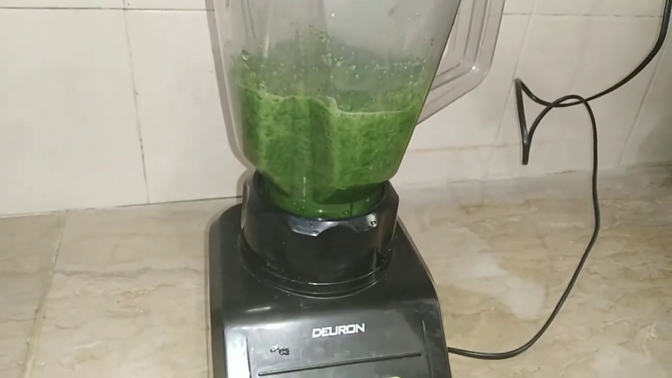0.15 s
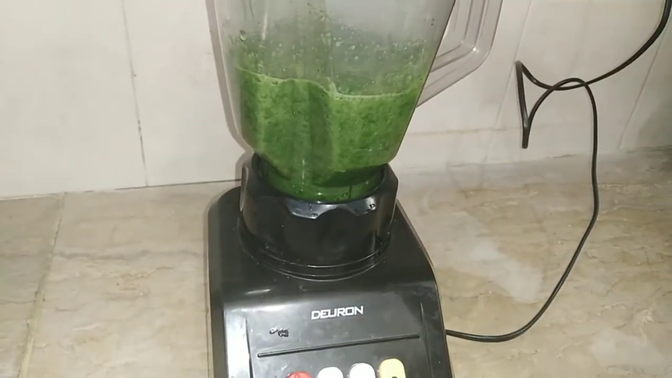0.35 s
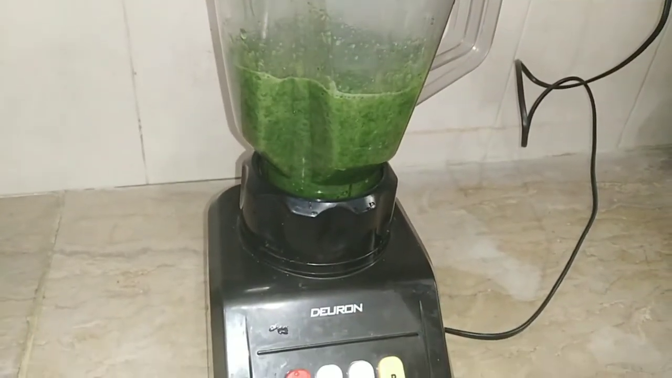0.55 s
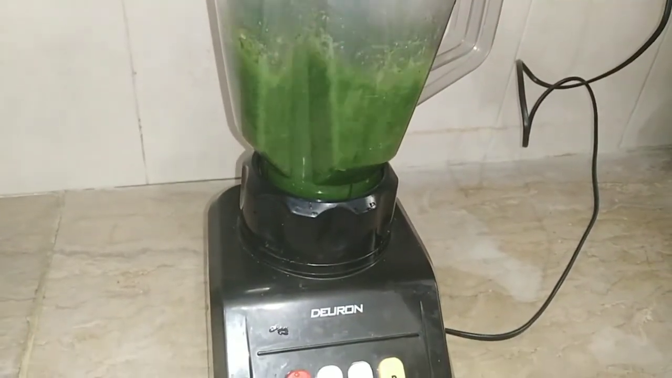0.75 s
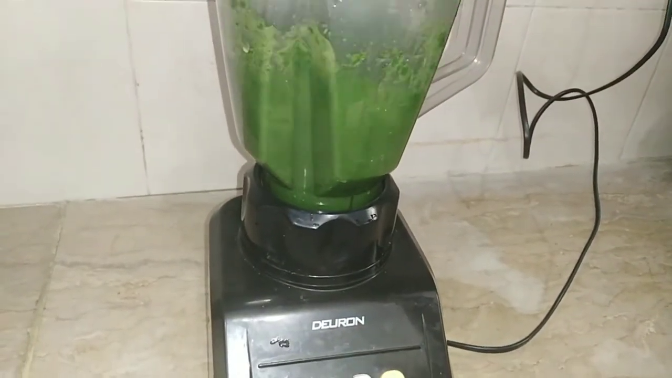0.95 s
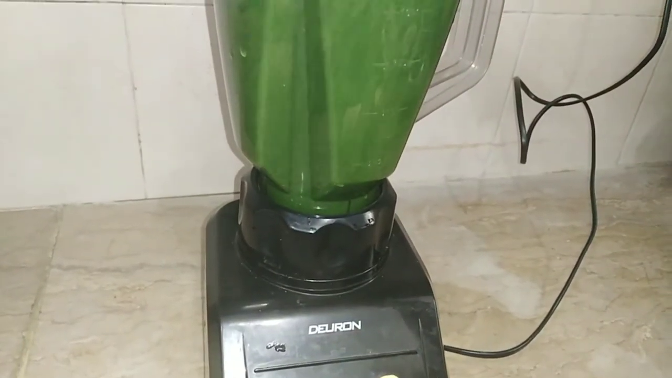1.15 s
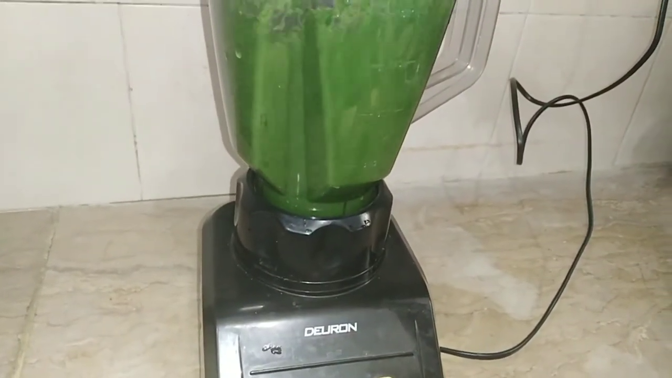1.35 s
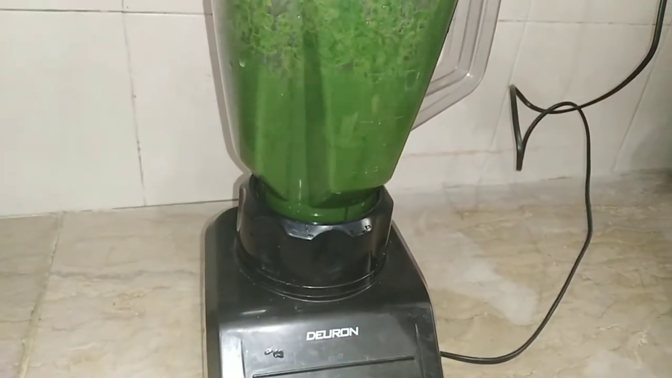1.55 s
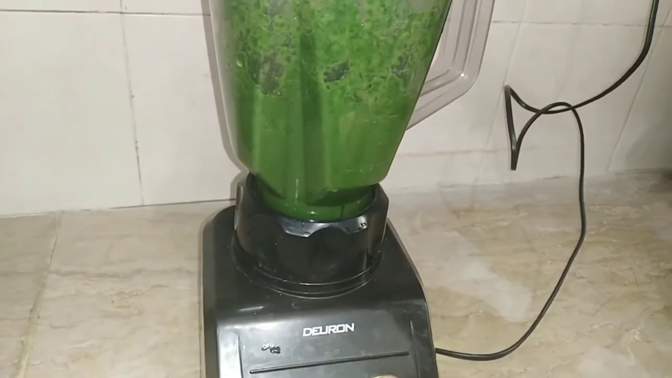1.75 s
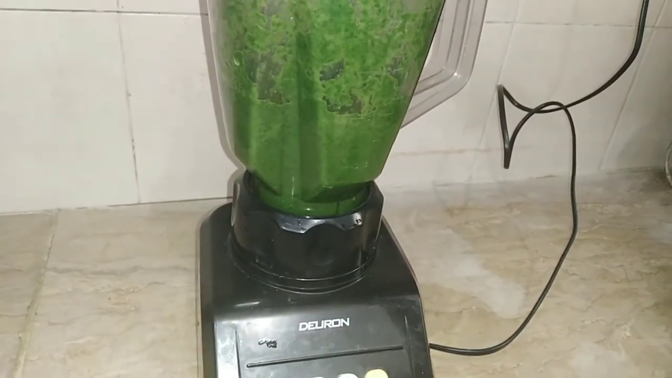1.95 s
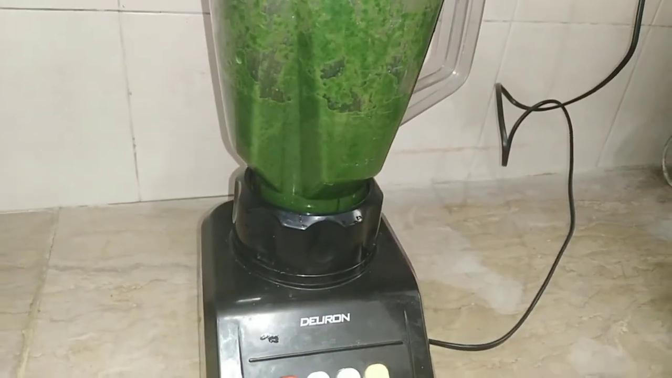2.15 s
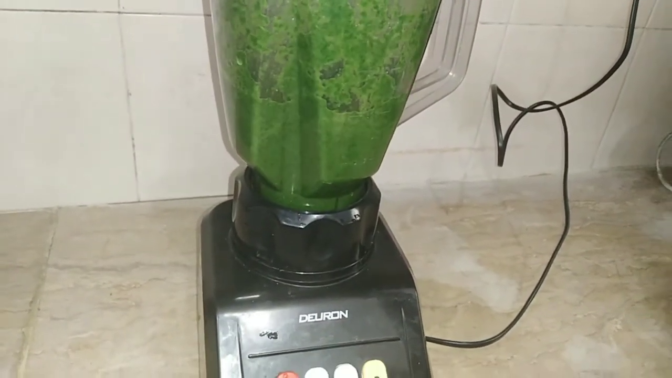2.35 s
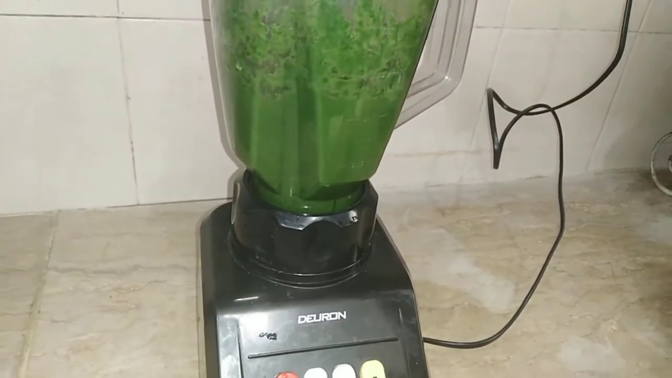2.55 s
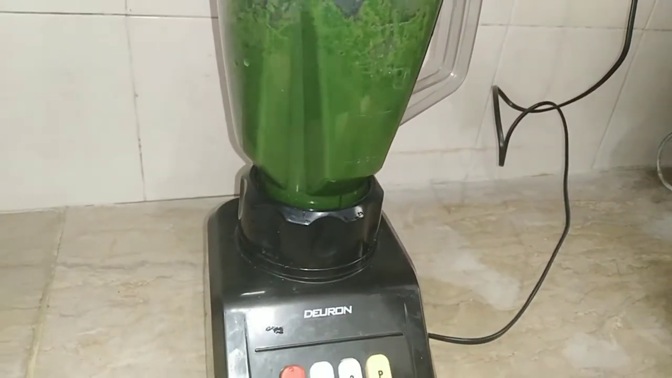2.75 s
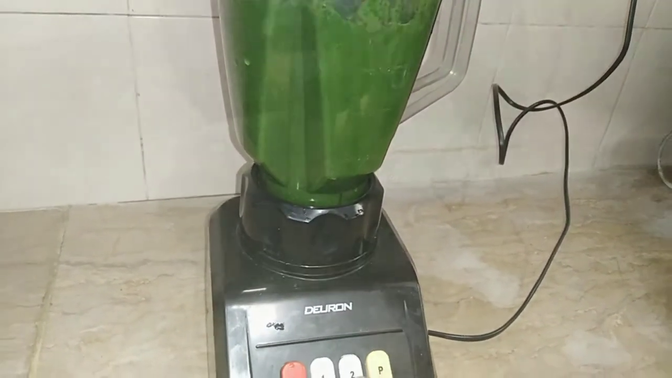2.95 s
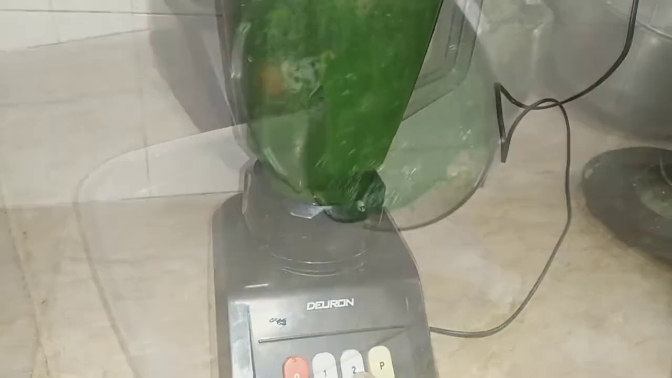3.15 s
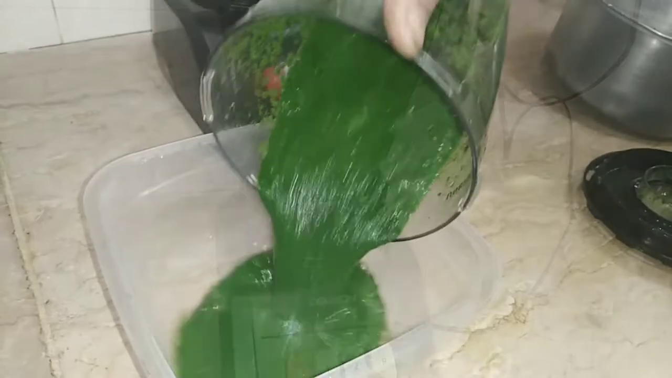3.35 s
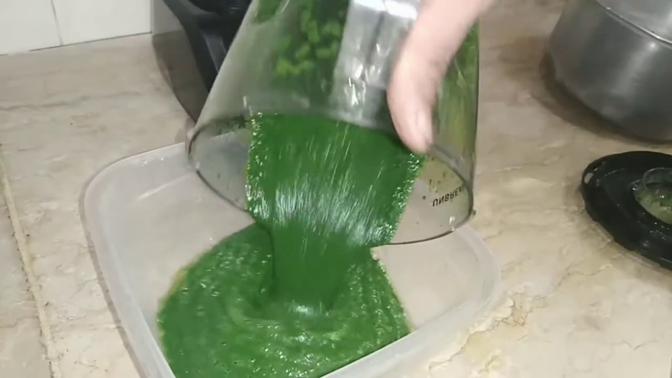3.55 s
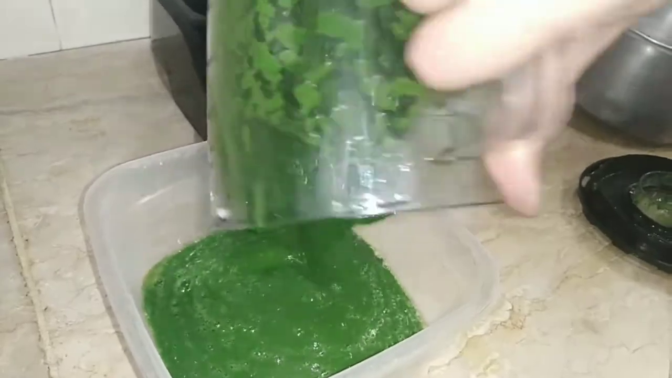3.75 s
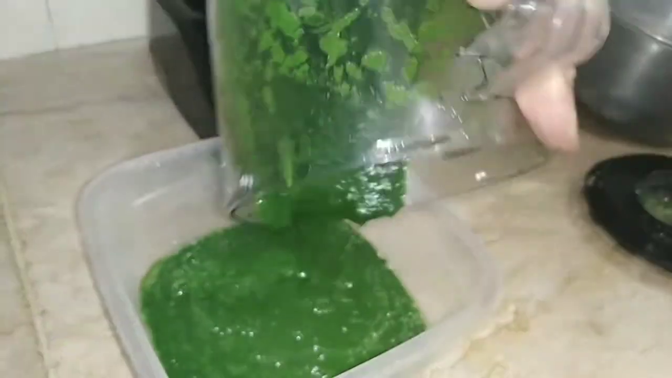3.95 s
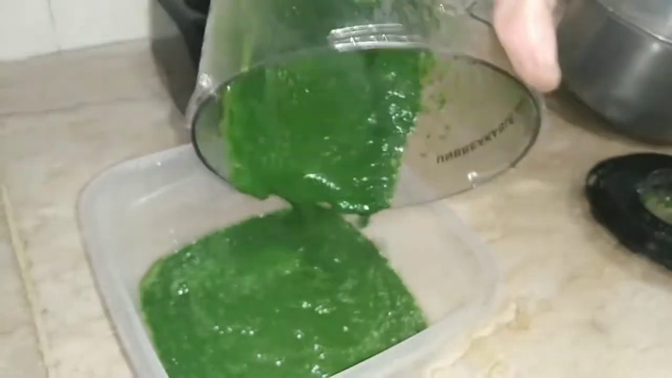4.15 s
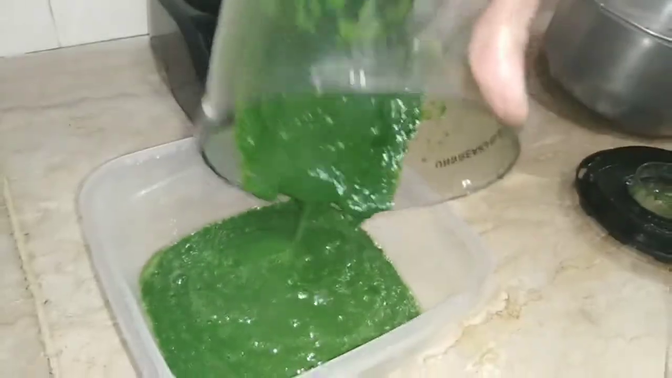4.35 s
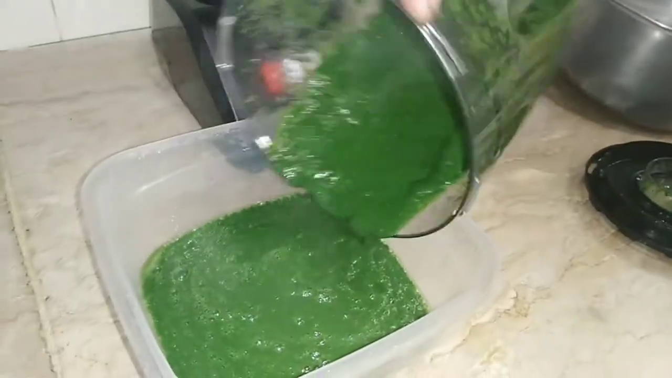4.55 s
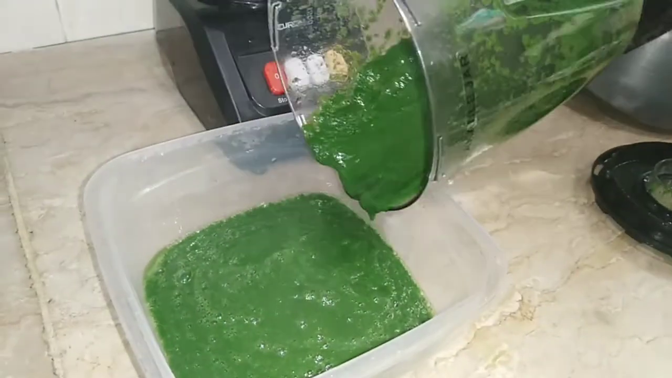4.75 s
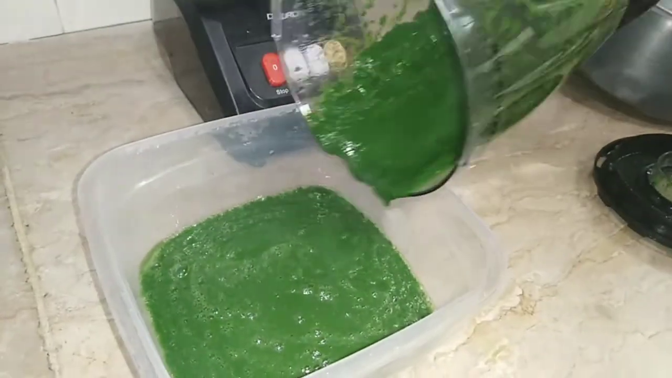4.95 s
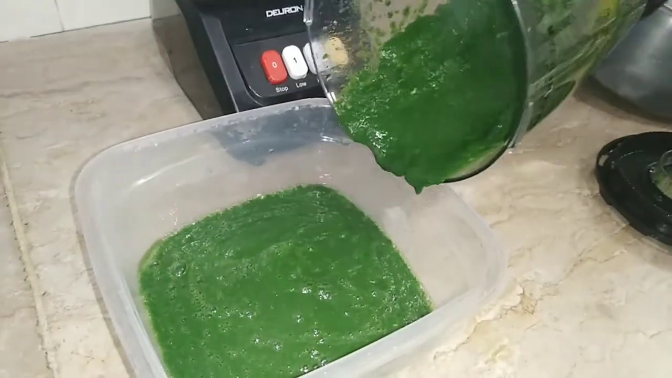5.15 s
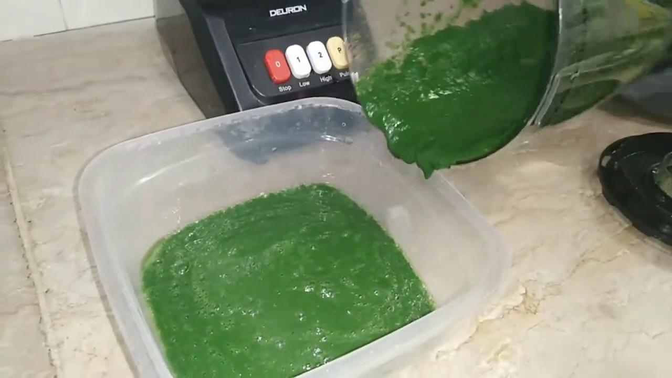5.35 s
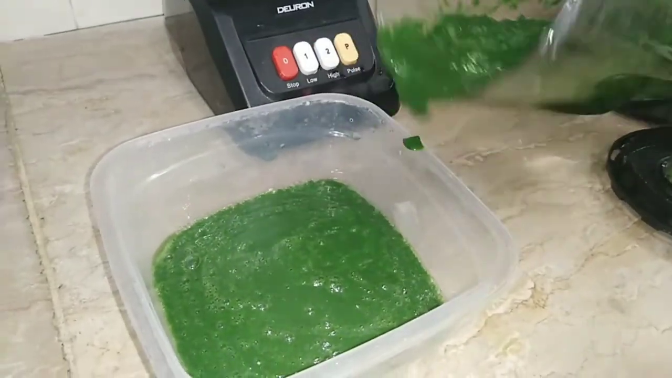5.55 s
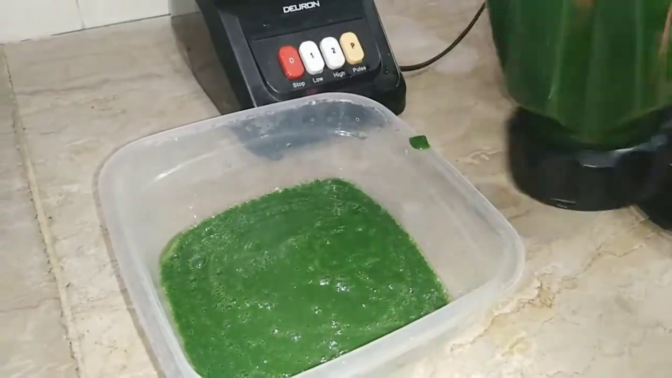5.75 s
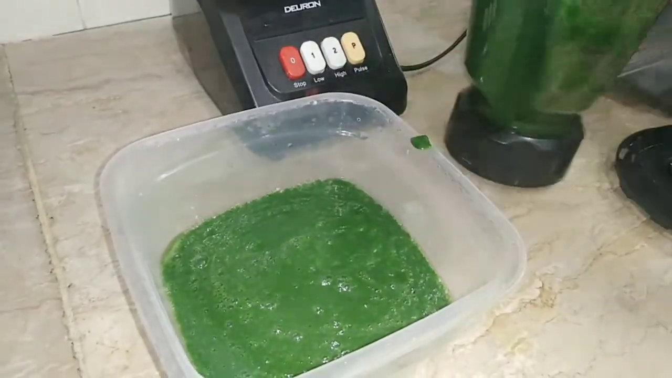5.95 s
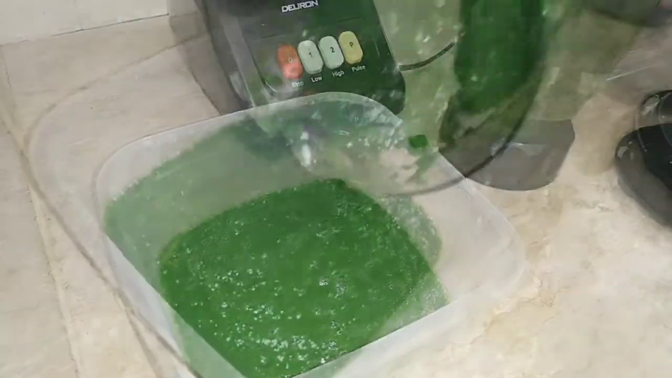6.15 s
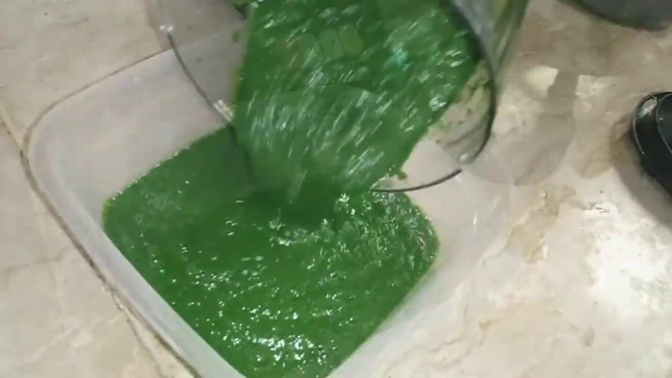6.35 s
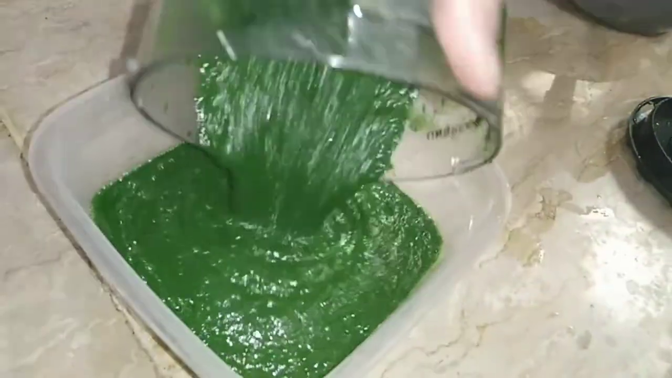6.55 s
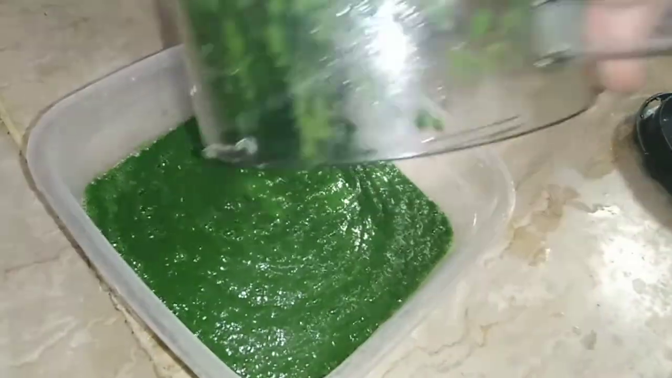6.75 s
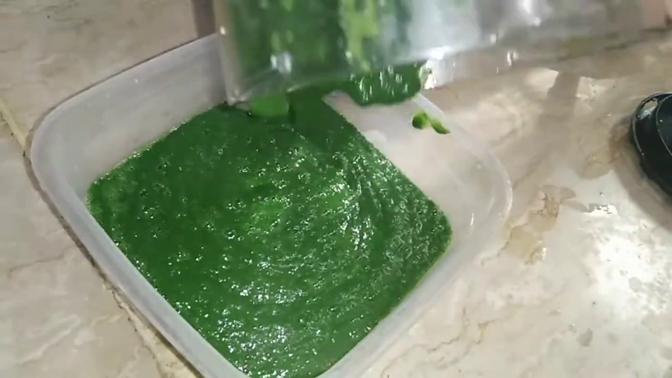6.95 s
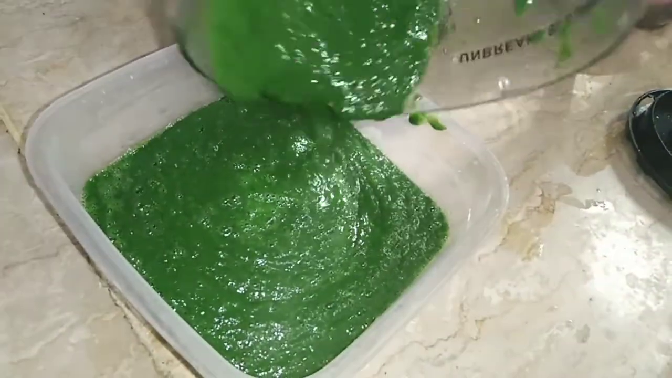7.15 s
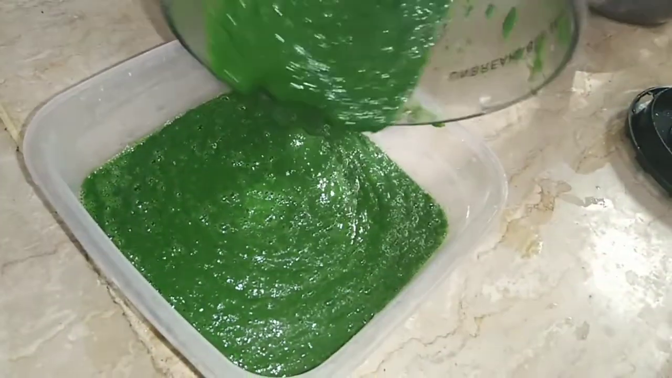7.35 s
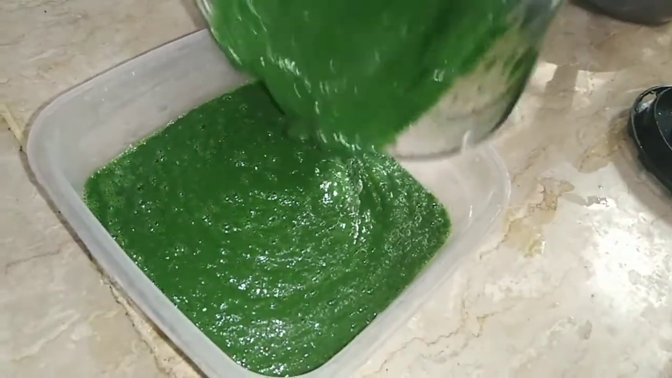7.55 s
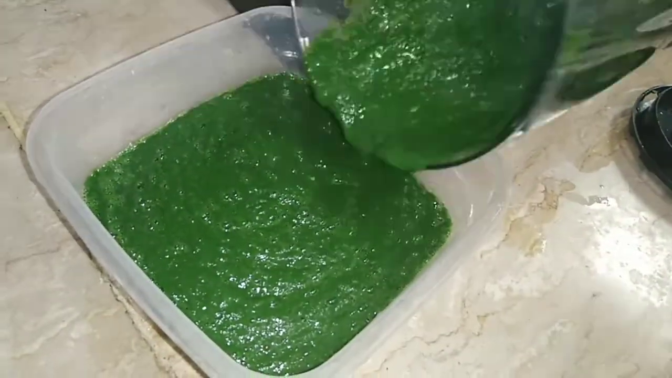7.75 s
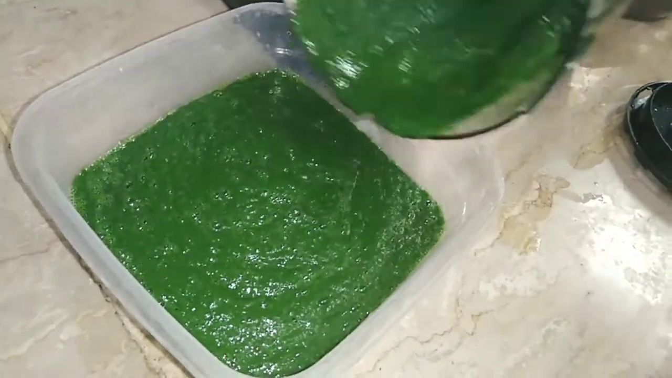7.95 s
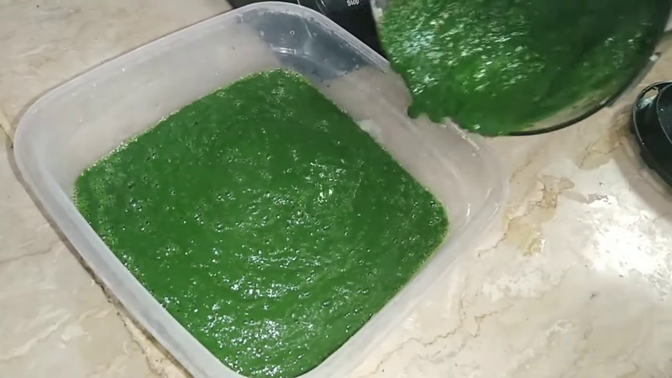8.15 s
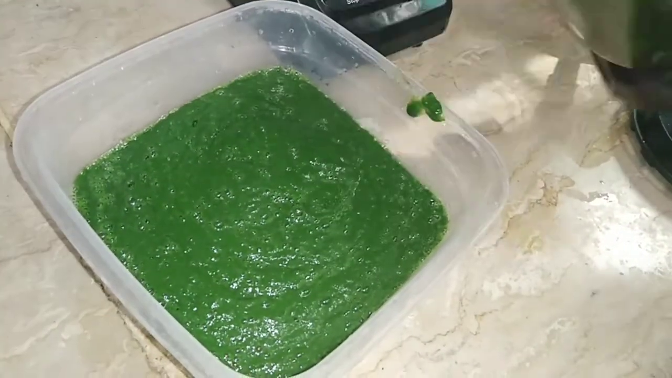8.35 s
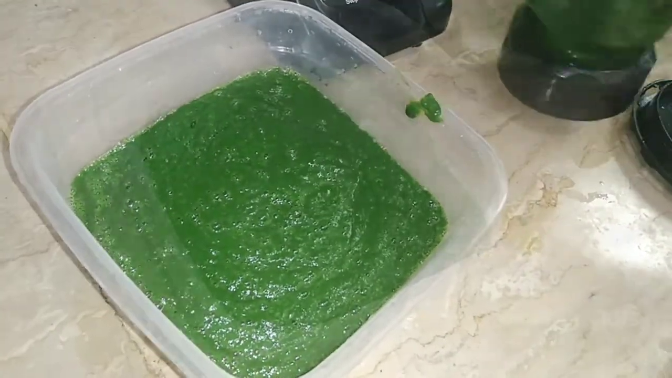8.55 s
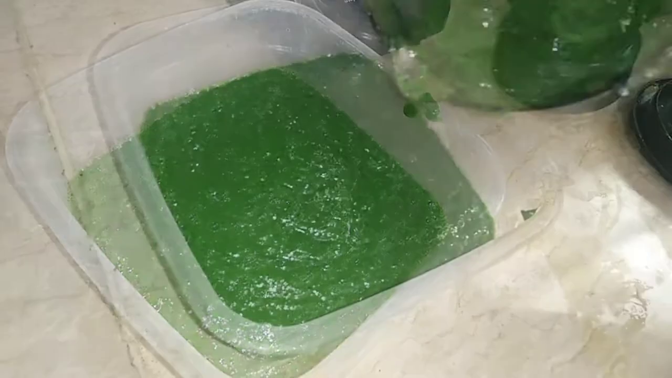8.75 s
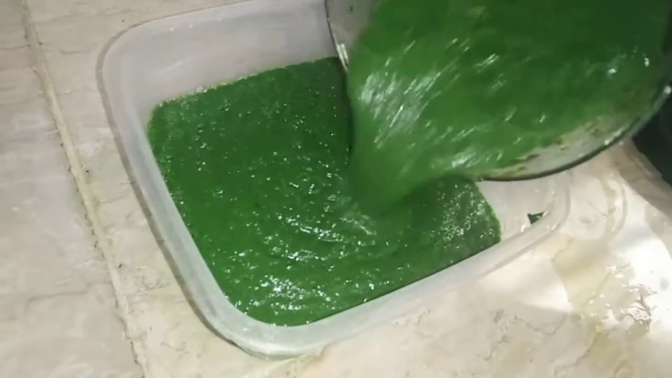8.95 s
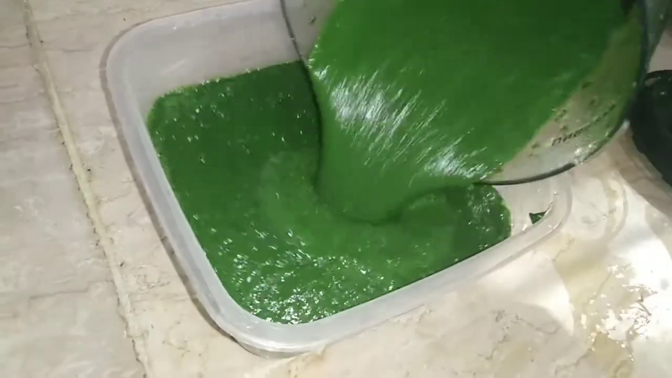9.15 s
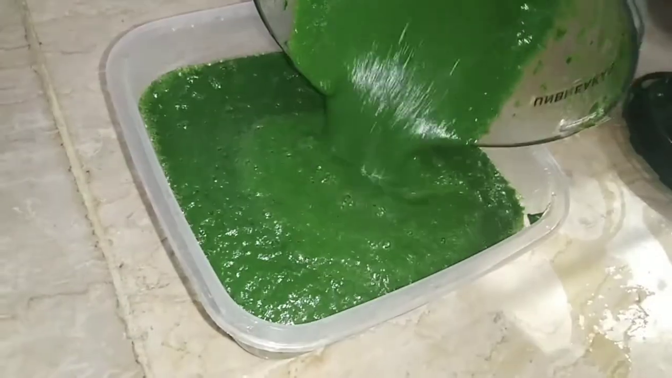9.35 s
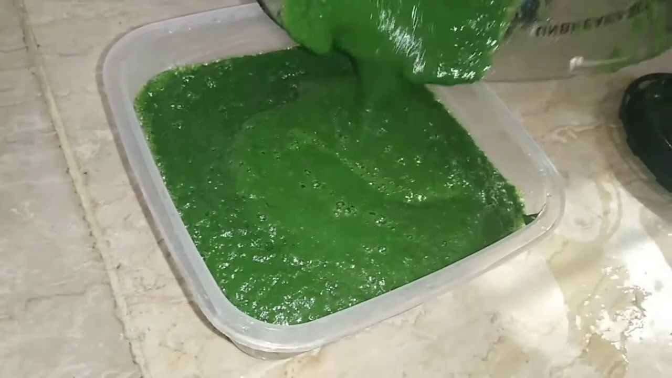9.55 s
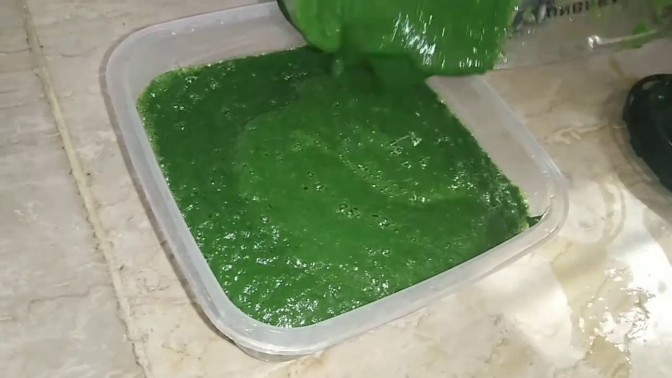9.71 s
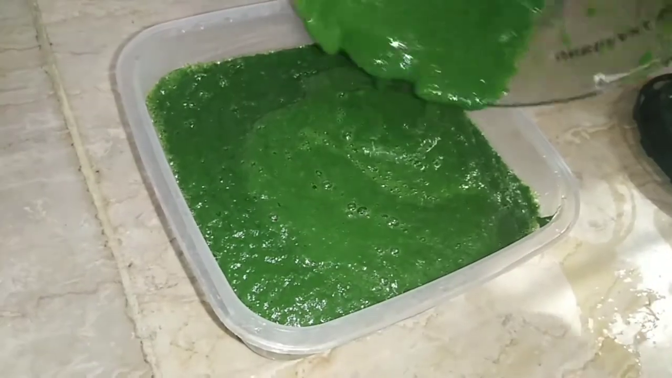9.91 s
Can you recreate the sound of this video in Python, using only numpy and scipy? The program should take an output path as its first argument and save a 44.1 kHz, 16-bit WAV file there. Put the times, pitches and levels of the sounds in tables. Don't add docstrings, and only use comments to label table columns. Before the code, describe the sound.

Close in a tiled kitchen, a faint knock and soft wet rustle open over quiet room tone. At 0.6 s a blender kicks in, a rough tonal buzz beneath a churning roar, racing free and sagging about six times before coasting down by 1.9 s. A knock at 2.4 s starts a second run with similar surges, fading from 3 s and gone by 3.7 s; crisp wet snaps come at 3.3 s. Low rumble then rises. Muffled finger bumps land at 3.8 and 4.7 s. From 4.2 s plastic scuffs, hollow rings and gurgles appear, with knocks and a long scrape around 5 to 5.5 s. A hard knock strikes at 6 s, then wet ticks and rubs, a heavy thud and splat at 8.1 s, scrapes at 8.5 s, a knock at 8.8 s with a squeak, and dense sticky ticking that thins out towards 10 s.

```python
import sys
import numpy as np
from scipy import signal
from scipy.fft import rfft, irfft, next_fast_len
from scipy.io import wavfile
from scipy.ndimage import uniform_filter1d

SR = 44100
rng = np.random.default_rng(int(sys.argv[2]) if len(sys.argv) > 2 else 0)


def gain_from_decibels(decibels):
    exponent = np.asarray(decibels, float) / 20
    return 10 ** exponent


def master_out(mix):
    frames = np.transpose(np.atleast_2d(mix))
    ceiling = np.clip(frames, -1, 1)
    pcm = np.round(ceiling * 32767).astype(np.int16)
    wavfile.write(sys.argv[1], SR, pcm)


N = 440118


def evened(x):
    return x / np.sqrt(np.mean(x ** 2) + 1e-20)


def read(points, hz):
    f, value = np.transpose(points)
    return np.interp(np.log(hz + 1), np.log(f + 1), value)


def add(mix, s, sound):
    part = mix[..., max(round(s * SR), 0):][..., :sound.shape[-1]]
    part += sound[..., :part.shape[-1]]


def resonate(x, hz, width):
    return signal.lfilter(*signal.iirpeak(hz, hz / width, SR), x)


# pitch_hz, likeness (0 to 1)
PORT_LIKENESS = [(60, .3), (150, 0.97), (380, 0.8), (800, 0.38), (1250, 0.63), (2000, 0.21), (15000, 0.098)]


def part_alike(first, other, hz):
    same = np.clip(read(PORT_LIKENESS, hz), -1, 1)[:, None]
    return same * first + np.sqrt(1 - same ** 2) * other


def noise(shape, count, patchy_db, size=512, bins=8):
    lag_s = .00017
    frames, hz = 2 * count // size + 5, np.fft.rfftfreq(size, 1 / SR)
    a, b, c, d, patches = rng.standard_normal((frames, len(hz), 5)).T
    patches = uniform_filter1d(patches, round(bins), axis=0)
    patches = evened(uniform_filter1d(patches, size=5, axis=1))
    left = a + 1j * b
    right = part_alike(left, c + 1j * d, hz)
    z = np.array([left * np.exp(-2j * np.pi * hz * lag_s)[:, None], right])
    z *= gain_from_decibels(read(shape, hz)[:, None] + patchy_db * patches)
    return evened(signal.istft(z, window="cosine", nperseg=size, noverlap=size // 2)[1][:, :count])


def burst(hz, octaves, rise, t60, count=6000, ripple_db=4):
    t = np.arange(count) / SR
    f = np.fft.rfftfreq(count, 1 / SR) + 1
    white, ripple = rng.standard_normal((count, 2)).T
    ripple = uniform_filter1d(ripple[:len(f)], size=count // 400)
    ripple = evened(uniform_filter1d(ripple, size=count // 400))
    ripple = evened(ripple - uniform_filter1d(ripple, size=count // 50))
    band = np.exp(-.5 * abs(np.log2(f / hz) / octaves) ** 3)
    treble_loss_db = 9 * np.maximum(np.log2(f / 8500), 0)
    x = irfft(rfft(white) * band * gain_from_decibels(ripple_db * ripple - treble_loss_db))
    rising = np.sin(np.pi / 2 * np.minimum(t / max(rise, 1e-4), 1)) ** 2
    return .5 * evened(x) * rising * gain_from_decibels(-60 * (np.maximum(t - rise, 0) / t60) ** 1.7)


def ring(hz, t60, rise=0.0034):
    t = np.arange(6500) / SR
    return np.sin(2 * np.pi * hz * t) * (1 - np.exp(-t / rise)) * gain_from_decibels(-60 * t / t60)


# pitch_hz, t60_s
KITCHEN_DECAY = [(200, 0.041), (1000, 0.19), (4000, 0.18), (10000, 0.2)]


def kitchen(x, wet_db, lag=4):
    taps = np.zeros((2, SR // 2))
    at = np.arange(150, SR // 2 - 20, 20) + rng.integers(0, 20, (2, (SR // 2 - 151) // 20))
    np.put_along_axis(taps, at, rng.choice([-1., 1.], at.shape), 1)
    hz, t, z = signal.stft(taps, SR, nperseg=256)
    z = np.array([z[0], part_alike(z[0], z[1], hz)])
    tail = signal.istft(z * gain_from_decibels(-60 * t / read(KITCHEN_DECAY, hz)[:, None]), SR, nperseg=256)[1]
    wet = signal.fftconvolve(x[None], tail / np.linalg.norm(tail[0]), axes=1)[:, :N]
    return np.array([np.roll(x, round(lag)), x]) + gain_from_decibels(wet_db) * wet


SWITCH_S = [.59, 2.349]
# after_switch_s, level_db of the roar
MOTOR_START = [
    (.008, -90),
    (0.015, -49),
    (0.072, -32),
    (.085, -38),
    (0.171, -34.5),
]
# time_s, level_db of the roar
RUN_ENDS = [
    [(1.6, -35), (1.68, -35.5), (1.894, -70), (1.97, -81)],
    [(2.974, -37.5), (3.36, -44), (3.58, -53), (3.72, -79.5)],
]


def run(switch, end):
    s, db = np.transpose([(switch + a, d) for a, d in MOTOR_START] + end)
    t = np.arange(s[0], s[-1], 1 / SR)
    return t, np.interp(t, s, db)


# pitch_hz, level_db per Hz
RUMBLE_SPECTRUM = [(15, -68), (25, -33.5), (59, -21.5), (82, -6), (102, 2.5), (167, -7), (204, -2),
                   (256, -10.5), (297, -4), (362, -11), (403, -23.5), (505, -36), (600, -31.5),
                   (780, -62.5), (1320, -120)]
# time_s, level_db
RUMBLE_LEVEL = [(0, -54), (.16, -73), (2.5, -73.5), (3.56, -50), (5.09, -47), (5.89, -50), (8.12, -47),
                (8.61, -50), (9.98, -48.5)]
# pitch_hz, level_db per Hz
MURMUR_SPECTRUM = [(150, -38.5), (260, -4), (330, 0), (430, -7.5), (520, -24), (750, -30.5), (1100, -60.5)]
# time_s, level_db
COUNTER_JOLTS = [
    (.69, -48),
    (1.778, -51),
    (2.45, -59),
]


def background():
    jolt_s, shake_db, hiss_db, murmur_db = .053, -32, -31.5, -79
    t = np.arange(N) / SR
    level = gain_from_decibels(np.interp(t, *np.transpose(RUMBLE_LEVEL)))
    shake = sum(gain_from_decibels(db) * np.exp(-((t - s) / jolt_s) ** 2) for s, db in COUNTER_JOLTS)
    for switch, end in zip(SWITCH_S, RUN_ENDS):
        add(shake, switch, gain_from_decibels(run(switch, end)[1] + shake_db))
    rumble = gain_from_decibels(-0.5) * noise(RUMBLE_SPECTRUM, count=N, patchy_db=1.5, size=2048, bins=3)
    hiss_spectrum = [(300, -6.0), (700, 1.0), (4000, -5.0), (14000, -10.5)]  # Hz, dB per Hz
    hiss = gain_from_decibels(hiss_db) * noise(hiss_spectrum, count=N, patchy_db=4.0)
    mix = level * (rumble + hiss) + shake * rumble
    murmur = noise(MURMUR_SPECTRUM, count=5 * SR // 2, patchy_db=3.0, size=2048, bins=3)
    add(mix, 0, gain_from_decibels(murmur_db) * murmur)
    return mix


# start_s, level_db, pace of the swing (cycles after t s: pace * t ** .72)
FINGER_BUMPS = [
    (3.778, -18, 35),
    (4.68, -15.5, 34),
    (4.702, -28, 34),
    (2.86, -36, 28),
]


def bumps():
    out, t = np.zeros((2, N)), np.arange(1800) / SR
    tick = np.exp(-((t - .0027) / .0004) ** 2)
    for s, db, pace in FINGER_BUMPS:
        swing = -np.sin(2 * np.pi * pace * t ** .72)
        swing *= np.exp(-(t / .014) ** 2) * np.tanh((t / .0011) ** 2)
        add(out[0], s + .0045, gain_from_decibels(db) * swing)
        add(out[0], s, gain_from_decibels(db - 11) * tick)
    return out


def swell(s, spread):
    t = np.arange(max(-s, -3 * spread), 3 * spread, 1 / SR)
    return s + t[0], gain_from_decibels(-13.5 * abs(t) / spread)


def droplets(count, per_s, lift_db):
    hits = (rng.random(count) < per_s / SR) * rng.exponential(1, count)
    return 1 + gain_from_decibels(lift_db) * signal.lfilter([1], [1, -np.exp(-1 / (0.0068 * SR))], hits)


# pitch_hz, level_db per Hz
TUB_HOLLOW = [(380, -51), (480, 12.5), (600, 13.5), (720, 1), (900, -42)]
# pitch_hz, level_db per Hz
SLIDE_BODY = [(600, -7.5), (800, -6), (1300, 0), (2500, -7.5), (3200, -34.5)]
# pitch_hz, level_db per Hz
SLIDE_FIZZ = [(2000, -31), (2700, -13), (4800, -5), (6300, -2.5), (7250, 5.5), (8300, -9), (14000, -25.5)]
# peak_s, spread_s, level_db
GURGLES = [(0, 0.18, -67.5), (3.91, 0.14, -57.5), (4.721, 0.17, -76), (5.24, .15, -53), (6.06, .1, -58.5),
           (6.33, 0.23, -63.5), (6.95, 0.2, -78), (7.26, 0.14, -73), (7.56, 0.24, -68), (8.14, 0.062, -51),
           (8.57, 0.11, -57.5), (8.94, 0.088, -57.5), (9.98, 0.086, -81)]
# peak_s, spread_s, body level_db, fizz level_db re body
SLIDES = [(0, 0.11, -58, 0.5), (2.33, .03, -74, -11), (4.72, 0.078, -77.5, -6), (5.04, 0.096, -75, -6),
          (5.281, .1, -59, -24.5), (5.68, 0.048, -100, 9), (6.18, .1, -69.5, 2), (6.47, 0.12, -66.5, 11.5),
          (6.69, .08, -75.5, 11), (7.699, .1, -74, 3), (8.14, .12, -73.5, 3), (8.571, .09, -65.5, -7),
          (8.78, .1, -61.5, 2), (8.9, .18, -63, 7), (9.098, .1, -71.5, 11.5), (8.72, .06, -64.5, 4.5),
          (9.02, .12, -71.5, 16.5), (9.22, .12, -81.5, 21), (6.4, .07, -61.5, 4), (9.8, .14, -82.5, 15),
          (9.97, 0.19, -94, 29)]


def slosh():
    out, tub, pour = np.zeros((2, N)), np.zeros(N), round(3.7 * SR)
    tub[pour:] = gain_from_decibels(-89)
    for s, spread, db in GURGLES:
        start, gain = swell(s, spread)
        add(tub, start, gain_from_decibels(db) * gain)
    for a, b in (0, SR // 2), (pour - SR // 4, N):
        out[:, a:b] = gain_from_decibels(4.0) * tub[a:b] * noise(TUB_HOLLOW, count=b - a, patchy_db=9.5, bins=1)
    for s, spread, db, fizz_db in SLIDES:
        start, gain = swell(s, spread)
        count = len(gain)
        body = droplets(count, 40, -4) * noise(SLIDE_BODY, count=count, patchy_db=6., bins=1)
        fizz = droplets(count, 110, -2) * noise(SLIDE_FIZZ, count=count, patchy_db=3.5, bins=3)
        add(out, start, gain_from_decibels(db) * gain * (body + gain_from_decibels(fizz_db - 3.5) * fizz))
    return out


# start_s, level_db, spacing_hz, t60_s
JAR_DRAGS = [
    (5.184, -46, 679, 0.15),
    (5.494, -67.5, 680, 0.049),
    (8.1, -52, 676, 0.071),
    (8.502, -46, 664, .1),
    (8.612, -44, 674, 0.067),
]
# start_s, level_db, pitch_hz, spread_octaves, t60_s
SPLATS = [(5.047, -38, 2000, 0.6, 0.013), (5.08, -44, 1700, .6, 0.011), (5.19, -60, 7200, 0.11, .16),
          (5.385, -52.5, 2480, 0.3, 0.08), (5.388, -62, 7500, .12, .06), (5.6, -64, 4600, 0.18, .06),
          (5.651, -54.5, 7520, .45, .06), (5.026, -60, 6900, .12, .03), (4.98, -66, 6900, .08, .2),
          (7.127, -40, 4000, .5, .012), (7.065, -54.5, 6500, 0.42, 0.11), (7.128, -54, 10500, .25, .07),
          (8.072, -32, 165, 0.39, 0.077), (8.072, -37, 560, 0.25, 0.071), (8.072, -33, 2700, 0.6, 0.039),
          (8.88, -34, 2370, .15, .11), (8.7, -52, 3000, .7, .16), (8.8, -48, 3000, .7, .14),
          (8.257, -58, 3100, .1, .05), (8.45, -63, 1600, .2, 0.11), (8.882, -43, 4670, .17, 0.11),
          (8.888, -46, 3400, .1, .06), (8.918, -44, 6700, .3, .006), (9.086, -48.5, 1500, 0.25, 0.023),
          (9.11, -64, 1600, 0.28, 0.035), (5.585, -54, 1900, .35, .11), (9.43, -66, 7200, .08, .16),
          (9.208, -42, 6000, 0.63, .004), (9.21, -58, 1130, 0.11, 0.034), (9.212, -61.5, 1740, .1, 0.05),
          (9.605, -58, 7150, 0.12, 0.16), (9.63, -57, 5000, .2, 0.096), (9.71, -61, 7200, 0.077, .2),
          (9.83, -57, 7200, .15, 0.2), (9.85, -58, 5200, .2, 0.12)]


def splats():
    out = np.zeros(N)
    for s, db, hz, t60 in JAR_DRAGS:
        loop = np.r_[1, np.zeros(round(SR / hz) - 1), -.62]
        rub = burst(1800, 1.32, .028, t60, ripple_db=2)
        add(out, s, gain_from_decibels(db) * signal.lfilter([1], loop, rub))
    for s, db, hz, octaves, t60 in SPLATS:
        add(out, s, gain_from_decibels(db) * burst(hz, octaves, 1.1 * t60 ** 2, t60, ripple_db=3.5))
    return kitchen(out, wet_db=-8.5, lag=3)


# start_s, level_db, pitch_hz, hardness_db re peak, t60_s
KNOCKS = [(0.004, -55, 361.4, -12, 0.34), (0.061, -43, 286, -24, 0.13), (0.155, -51.5, 307, -31, 0.12),
          (1.906, -49.5, 289, -25, 0.12), (2.403, -32, 269.7, -22, 0.17), (4.824, -25.5, 326, -36, 0.058),
          (4.87, -35.5, 335, -43, 0.12), (5.048, -29, 340, -30.5, 0.067), (5.08, -30.5, 285, -36, 0.075),
          (5.115, -44.5, 400, -41, 0.075), (5.729, -42.5, 297, -65, 0.079), (5.984, -15.5, 432, -32, 0.08),
          (6.128, -37, 209.6, -41, 0.27), (6.147, -27.5, 451, -35, 0.081), (6.247, -36.5, 276, -56, 0.057),
          (8.072, -27.5, 406, -20.5, 0.076), (8.52, -38.5, 285, -24, 0.13),
          (8.775, -20.5, 290, -36.5, 0.058)]


def knocks():
    out = np.zeros(N)
    for s, db, hz, hard_db, t60 in KNOCKS:
        body = ring(hz, t60) + 0.84 * ring(0.674 * hz, 0.59 * t60) + .5 * ring(1.45 * hz, 0.75 * t60)
        add(out, s, gain_from_decibels(db + 3.0) * body)
        add(out, s, gain_from_decibels(db + 4 + .56 * hard_db) * burst(790, 0.97, 0.0019, 0.04, count=3000))
        add(out, s, gain_from_decibels(db + hard_db + 14.0) * burst(2700, 0.99, 0.00065, 0.024, count=3000))
    return out


# start_s, level_db, pitch_hz, brightness_db re peak, t60_s
SCUFFS = [(4.16, -51.5, 1200, -14, 0.14), (4.22, -78.5, 3000, 14, .08), (5.022, -47, 1500, -22, .06),
          (4.98, -48, 1030, -30, 0.39), (5.194, -25.5, 1430, -44, 0.26), (5.383, -41.5, 1630, -45, 0.04),
          (5.5, -47, 1460, -36, 0.027), (5.584, -45, 1450, -34, 0.18), (5.65, -66, 1680, -7, 0.046),
          (6.346, -47, 1330, 0.5, 0.25), (6.383, -27.5, 1950, -19.5, 0.15), (6.44, -41, 2720, -13, 0.22),
          (6.784, -47, 1440, -15, 0.073), (7.071, -59, 1240, -6, 0.11), (7.526, -38, 970, 1.5, 0.12),
          (7.547, -32, 1500, -0.5, 0.11), (7.949, -62.5, 2970, 9.5, 0.22), (8.118, -30.5, 1590, -44, 0.071),
          (8.273, -50.5, 2440, 2, 0.17), (8.515, -35, 1380, -7, 0.14), (8.624, -35, 2030, -6, 0.081),
          (8.8, -37, 1610, -14, 0.62), (8.888, -32.5, 2480, -21.5, 0.065), (9.084, -39.5, 1530, -7, 0.032),
          (9.618, -56.5, 1360, -4, 0.28), (9.835, -51, 1970, -18, 0.2)]


def scuffs():
    out, rise_s, lead_s = np.zeros(N), .036, .018
    for s, db, hz, bright_db, t60 in SCUFFS:
        add(out, s - lead_s, gain_from_decibels(db - 14) * burst(0.76 * hz, 1.37, rise_s, t60, ripple_db=3.5))
        add(out, s - lead_s, gain_from_decibels(db + bright_db - 2.5) * burst(5100, 0.92, rise_s, 0.62 * t60))
    return out


# start_s, level_db, pitch_hz, spread_octaves
TICKS = [(0.156, -69, 7240, 0.48), (0.3055, -66, 5190, 0.18), (3.316, -29.5, 8300, 0.72),
         (3.32, -34, 7300, .25), (3.336, -28, 6700, 0.3), (3.338, -31, 7100, 0.15),
         (3.744, -50, 6200, 0.27), (3.92, -47.5, 7270, 0.21), (4.0165, -59, 7300, 0.39),
         (4.278, -46.5, 6040, 0.67), (4.3874, -56.5, 5050, 0.9), (4.443, -65, 8200, 0.21),
         (5.9867, -26.5, 1480, 0.51), (6.264, -51, 1100, 0.82), (6.273, -60, 7110, 0.69),
         (6.4702, -44, 7490, 0.41), (6.5338, -51, 7260, 0.48), (6.554, -38, 6460, 0.96),
         (6.6678, -59, 6900, 0.4), (6.686, -50, 6820, 0.39), (6.7017, -40, 5340, 0.66),
         (6.766, -54, 8500, .2), (6.8063, -50.5, 3130, .2), (6.874, -30, 3880, 0.45),
         (6.874, -51, 11000, 0.3), (6.9514, -47.5, 7100, 1.1), (7.1253, -25.5, 6000, 0.76),
         (7.2782, -42, 6850, 0.67), (7.3623, -37.5, 5300, 0.59), (7.656, -38, 7700, 0.86),
         (8.797, -42, 6900, 0.6), (8.871, -51, 7500, .4), (8.974, -38.5, 7600, .35),
         (8.998, -43, 7000, 0.37), (9.017, -42, 6800, 0.44), (9.088, -38.5, 4300, 0.96),
         (9.106, -40, 7000, 0.29), (9.114, -42, 7000, .4), (9.176, -40.5, 7350, .4),
         (9.184, -42.5, 7800, 0.43), (9.217, -44, 7200, 0.27), (9.2396, -50, 7310, .3),
         (9.281, -49, 7050, .35), (9.2075, -49, 4220, 0.79), (9.251, -46, 7200, 0.26),
         (9.3386, -51.5, 7100, 0.17), (9.413, -52, 7000, 0.26), (9.4185, -43, 6500, 0.38),
         (9.5708, -55.5, 8500, 0.22), (9.6753, -50, 8350, 0.23)]


def ticks():
    trails, near = np.zeros((2, N))
    for s, db, hz, octaves in TICKS:
        trail_db = -11.5 - 28 * octaves
        snap = burst(hz, octaves, .0008, .008, count=1200)
        halo = burst(hz, octaves, .006, .025, count=1200)
        trail = burst(min(hz, 6800), .8 * octaves, .016, .07, ripple_db=6)
        add(near, s - .004, gain_from_decibels(db - 9) * halo)
        add(near, s, gain_from_decibels(db) * snap / abs(snap).max())
        add(trails, s - .008, gain_from_decibels(db + trail_db) * trail)
    return trails, near


# start_s, level_db, pitch_hz
SPRAY = (6.785, -60, 11500)


def spray():
    out = np.zeros(N)
    s, db, hz = SPRAY
    add(out, s, gain_from_decibels(db) * burst(hz, .3, 0.0039, .09))
    return out


# start_s, level_db, pitch_hz, t60_s
WHISTLES = [(3.769, -69, 1490, 1), (4.4594, -76, 6440, 0.22), (4.6598, -67, 6300, 0.1),
            (6.569, -64, 8400, 0.49), (7.245, -67, 7050, 0.28), (7.75, -59, 3190, 0.23),
            (7.79, -71, 6650, 0.37), (7.659, -57, 1840, 0.44), (7.9154, -67, 2820, 0.097),
            (4.461, -75, 7450, .15), (4.97, -57, 1040, .25), (4.6, -70, 2050, .2), (5.5, -63, 1700, 0.1),
            (5.585, -55, 938, 0.17), (5.585, -58, 1980, 0.21), (7.345, -61, 3000, 0.12),
            (7.745, -59, 4900, 0.073), (7.76, -63.5, 1280, 0.41), (7.7, -60, 2570, 0.19),
            (9.6, -59, 1880, 0.11), (8.4, -61, 1640, 0.37), (8.9, -41.5, 2384, 0.18),
            (8.888, -36.5, 4840, 0.093), (6.95, -67, 1600, 0.048), (7.128, -65, 1530, 0.043),
            (6.6, -47, 2820, 0.066), (8.8, -48, 6393, 0.18), (7.35, -59, 4400, .1)]


def whistles():
    out, count = np.zeros(N), 12000
    for s, db, hz, t60 in WHISTLES:
        wobble_db = 5 * evened(uniform_filter1d(rng.standard_normal(count), size=900))
        add(out, s, gain_from_decibels(db - 6.0 + wobble_db) * burst(hz, 0.056, 0.0049, t60, count=count))
    return out


# start_s, level_db, pitch_hz, t60_s
RINGS = [(0.239, -43.5, 1515, 0.077), (4.178, -37.5, 1282, 0.11), (5.383, -37.5, 1263, 0.087),
         (6.274, -32, 1323, 0.059), (6.7, -61, 1170, 0.19), (7.548, -28.5, 1413, 0.073),
         (5.392, -46.5, 2120, 0.1), (8.527, -32.5, 1365, 0.072), (8.847, -38, 1390, 0.13),
         (9.453, -68, 980, 0.59), (9.733, -61, 832, 0.18)]


def rings():
    out = np.zeros(N)
    for s, db, hz, t60 in RINGS:
        add(out, s, gain_from_decibels(db - 4.0) * ring(hz, 0.68 * t60, 0.002))
        add(out, s, gain_from_decibels(db - 10.5) * burst(0.961 * hz, 0.095, 0.0069, t60))
        add(out, s, gain_from_decibels(db - 28.0) * burst(1.4 * hz, 0.57, 0.0091, t60))
    return out


def handling():
    trails, near = ticks()
    far = knocks() + scuffs() + trails + spray() + whistles() + rings()
    far, near = (x + gain_from_decibels(2.5) * resonate(x, 7180, 1000) for x in (far, near))
    return kitchen(far + 0.35 * near, wet_db=-6.0) + 0.68 * np.array([np.roll(near, 4), near])


def shaft(t, surges, last):
    climb_s, shoulder_s = .08, .042
    first_speed, spin_up_s, loaded_speed = 150, .05, 174
    rows = [(t[0], first_speed), (t[0] + spin_up_s, loaded_speed)]
    for s, top in surges:
        low = loaded_speed + 11 * (s - t[0])
        shoulder = low + .62 * (top - low)
        rows += [(s - climb_s, low), (s - shoulder_s, shoulder), (s, top), (s + shoulder_s, shoulder)]
    return np.interp(t, *np.transpose(rows + [(t[-1], last)]))


# multiple of the turn rate, level_db
SHAFT_ORDERS = [(1, 1), (2, -1), (3, -5), (4, -3), (5, -4), (6, -3), (7, -5), (8, -9), (9, -12), (10, -14),
                (11, -17), (12, -4), (13, -22)]
# pitch_hz, width_hz, level_db
HOUSING_MODES = [(215, 90, 0), (380, 60, 6), (670, 70, 0), (895, 60, 6), (1183, 70, 6), (1455, 70, 5),
                 (2530, 150, 12), (2800, 90, 4)]
# pitch_hz, level_db per Hz
ROAR_SPECTRUM = [(30, -43), (128, -29), (206, -12.5), (300, -4.5), (502, -20), (900, -10), (1920, -15.5),
                 (2600, -15), (4600, -24), (6200, -17.5), (7300, -10), (8500, -23), (13600, -41),
                 (14800, -59)]
# time_s, top speed in turns per s
SHAFT_SURGES = [
    [(.745, 200), (.885, 217), (1.04, 219), (1.205, 231), (1.375, 220), (1.535, 237)],
    [(2.53, 210), (2.67, 217), (2.83, 231), (2.985, 234), (3.14, 236), (3.305, 232), (3.475, 234),
     (3.6, 214)],
]


def blender():
    tones, roar = np.zeros(N), np.zeros((2, N))
    last_speeds, tone_db, step = (120, 185), -2.5, 200
    for switch, end, surges, last in zip(SWITCH_S, RUN_ENDS, SHAFT_SURGES, last_speeds):
        t, roar_db = run(switch, end)
        speed = uniform_filter1d(shaft(t, surges, last), size=900)
        shudder = evened(uniform_filter1d(rng.standard_normal(len(t)), size=130))
        turns = np.cumsum(speed * (1 + .019 * shudder)) / SR
        flutter_db = rng.standard_normal((len(t) // step + 2, len(SHAFT_ORDERS)))
        flutter_db = 2.2 * evened(uniform_filter1d(flutter_db, size=5, axis=0))
        flutter_t = t[0] + np.arange(len(flutter_db)) * step / SR
        orders = np.zeros(len(t))
        for (multiple, db), f in zip(SHAFT_ORDERS, flutter_db.T):
            level = gain_from_decibels(db + np.interp(t, flutter_t, f))
            orders += level * np.cos(2 * np.pi * (multiple * turns + rng.random()))
        housing = 0.4 * orders + sum(gain_from_decibels(db) * resonate(orders, hz, w) for hz, w, db in HOUSING_MODES)
        coasting_db = np.interp(t, [1.6, 1.66, 2.3, 2.31, 3.5, 3.62], [0, -9, -9, 0, 0, -12])
        racing_db = 1.8 * np.tanh(np.gradient(speed) * SR / 300) + .06 * (speed - 205)
        fade = signal.windows.tukey(len(t), .006)
        add(tones, t[0], gain_from_decibels(roar_db + tone_db + racing_db + coasting_db) * evened(housing) * fade)
        throb = 1 + 0.087 * np.cos(2 * np.pi * turns)
        churn = noise(ROAR_SPECTRUM, count=len(t), patchy_db=2.6)
        add(roar, t[0], gain_from_decibels(roar_db - .2) * throb * fade * churn)
    return kitchen(tones, wet_db=-4, lag=5) + roar


def scene():
    return blender() + slosh() + handling() + bumps() + background() + splats()


def low_pass(x):
    return signal.sosfilt(signal.butter(12, 15550, fs=SR, output="sos"), x)


# pitch_hz, left minus right level_db
PORT_BALANCE = [(60, -0.5), (300, 0.5), (1300, -1.1), (2400, -0.7), (4600, 2.5), (6200, -17), (7300, -16),
                (8600, -3.5), (15000, -2.5)]


def record(dry):
    size = next_fast_len(N)
    hz = np.fft.rfftfreq(size, 1 / SR)
    left_share = 1 / (1 + gain_from_decibels(-2 * read(PORT_BALANCE, hz)))
    gains = np.sqrt(2 * np.array([left_share, 1 - left_share]))
    mix = irfft(rfft(dry, size) * gains, size)[:, :N]
    return low_pass(mix)


dry = scene()
out = record(dry)
master_out(out)
```